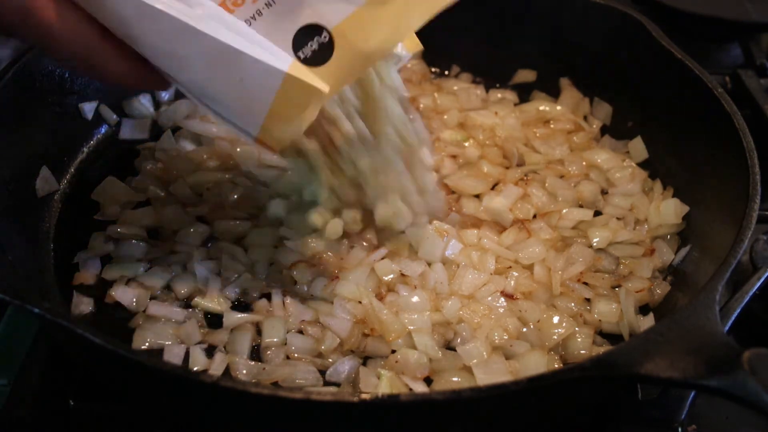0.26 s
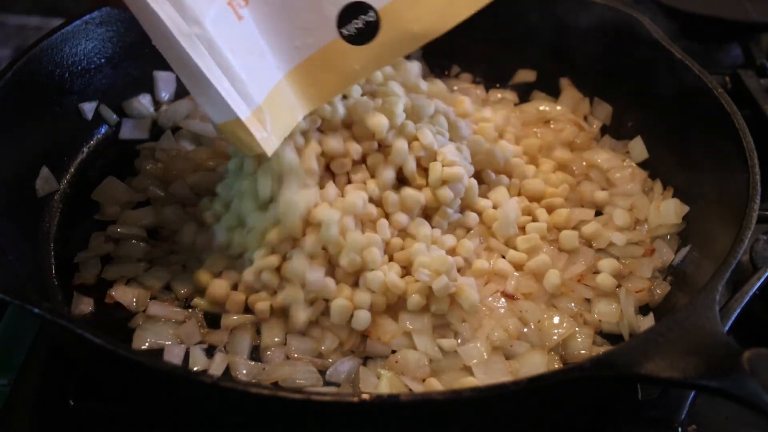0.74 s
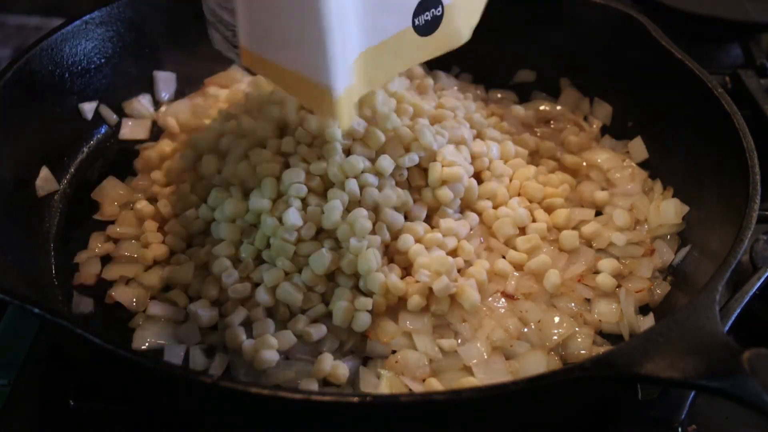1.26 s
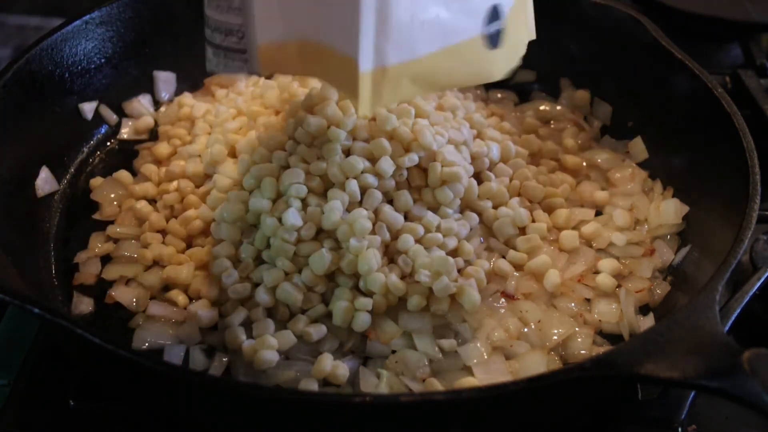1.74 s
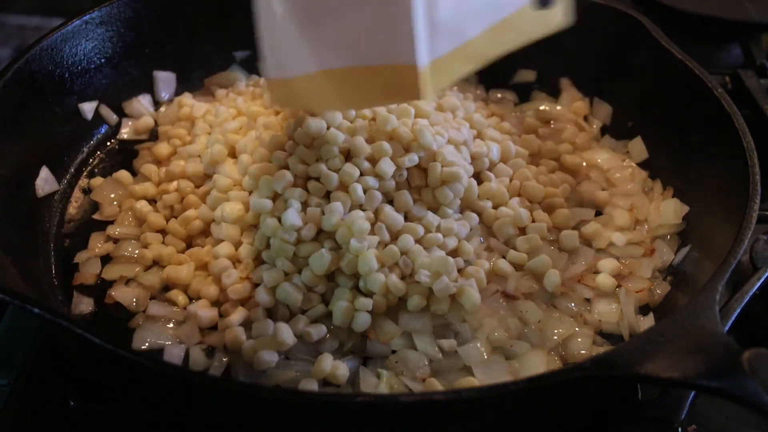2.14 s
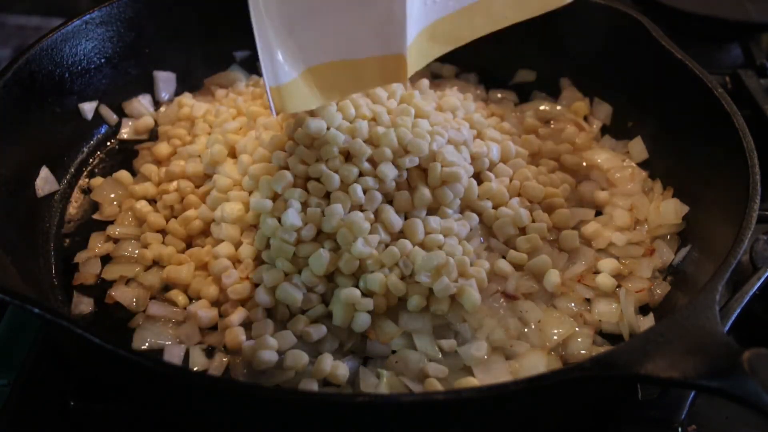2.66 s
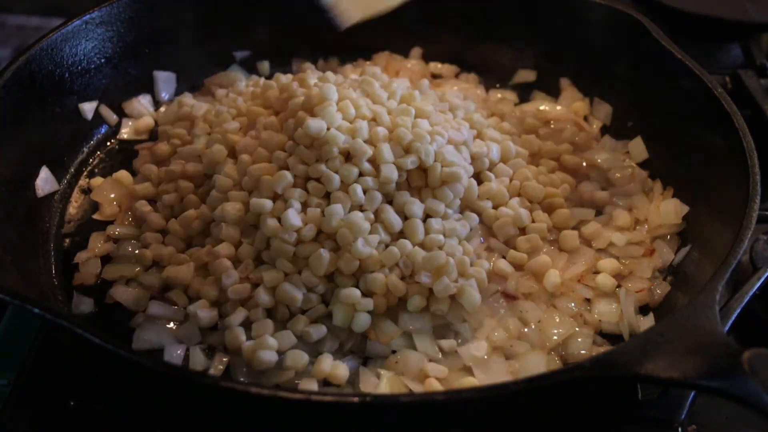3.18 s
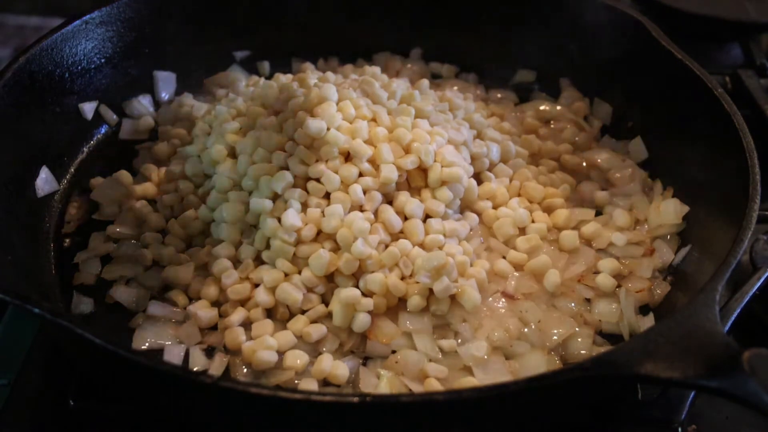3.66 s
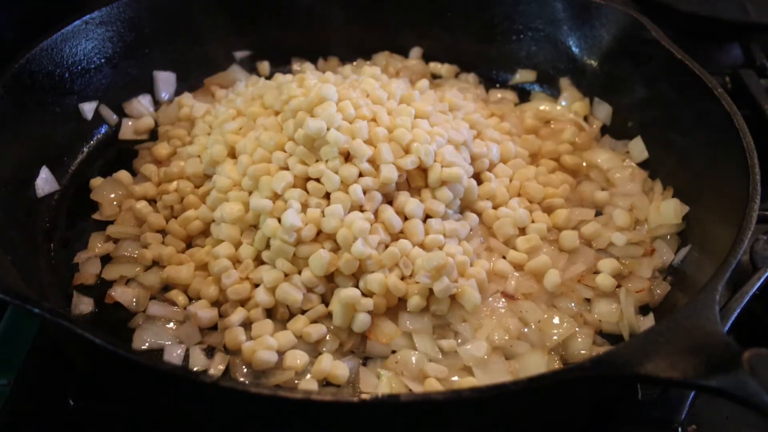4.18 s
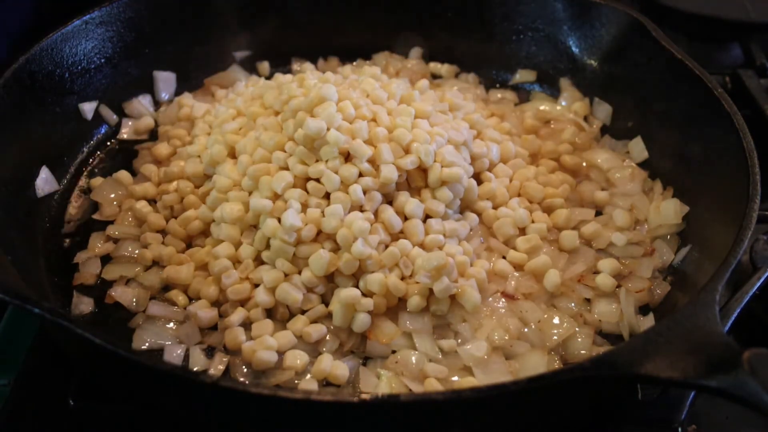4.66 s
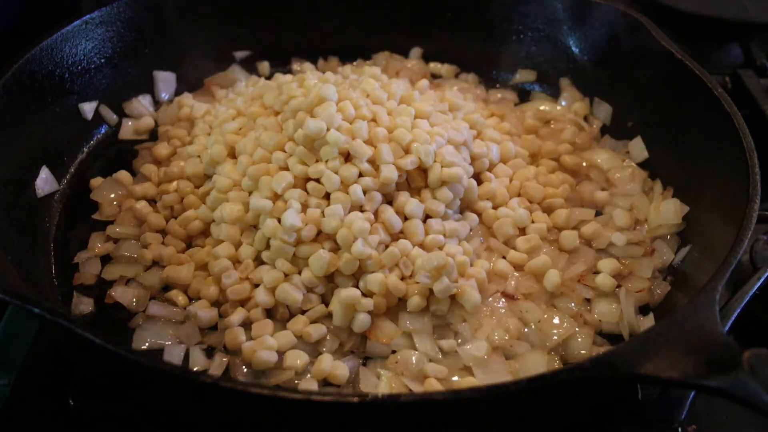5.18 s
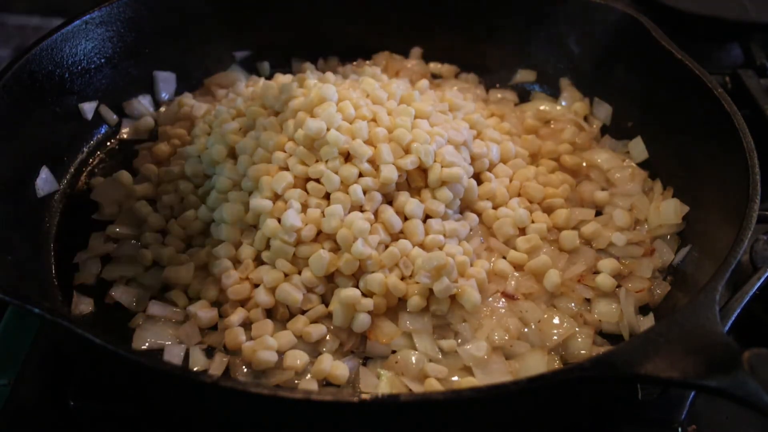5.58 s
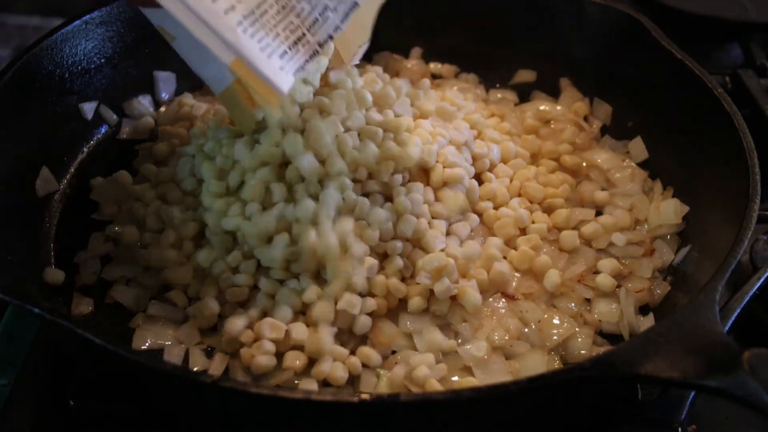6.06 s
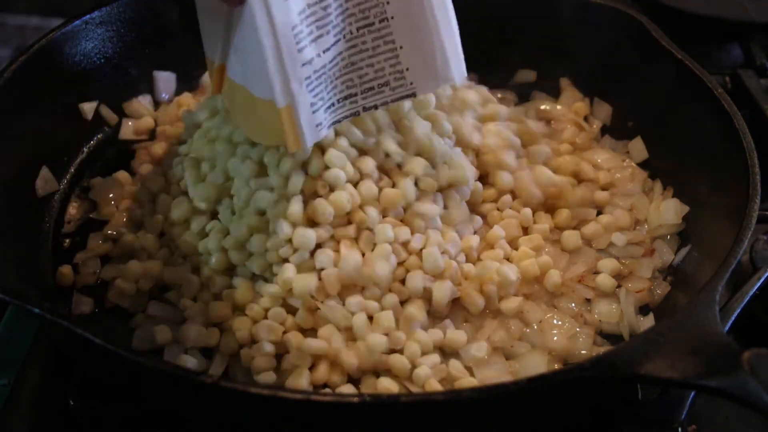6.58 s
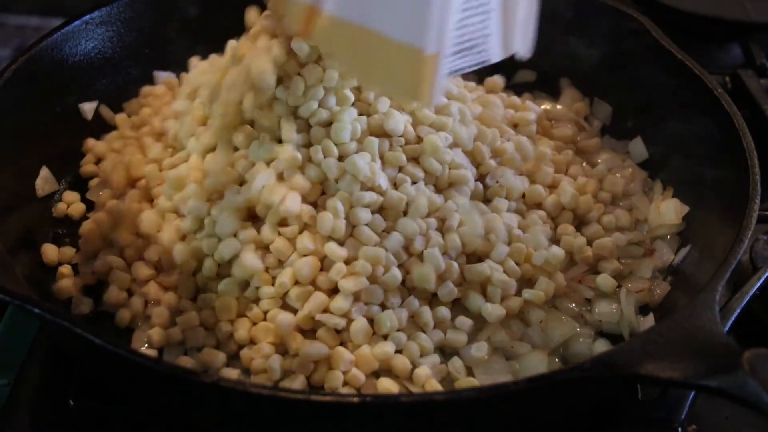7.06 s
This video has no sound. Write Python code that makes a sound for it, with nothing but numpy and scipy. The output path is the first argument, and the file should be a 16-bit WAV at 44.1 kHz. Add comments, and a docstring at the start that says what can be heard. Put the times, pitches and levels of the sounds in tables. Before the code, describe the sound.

A skillet hisses steadily with tiny bright ticks. Hard kernels scrape down plastic film, knock on the hollow bag and patter on a growing heap; shakes bring clusters of sharp crackles. After a quieter gap around the middle, the bag returns and pours again, densely and loudly, over a livelier sizzle. Close stereo pickup in a kitchen with a faint low background rush.

```python
"""Crackles of a stiff plastic bag, close to a camera microphone in a kitchen, over the hiss of a skillet.
Frozen corn is shaken from the bag onto frying onions: kernels scrape down the film, knock on it and patter
on the heap. Film buckles are shaped noise bursts with short pitched rings; damped modes ring the bag's hollow.
Under it fat sizzles as noise with tiny rings in it and spits in fine ticks, over the low rush of the room."""
import sys
import numpy as np
from scipy import signal
from scipy.fft import rfft, irfft, next_fast_len
from scipy.io import wavfile
from scipy.ndimage import uniform_filter1d, map_coordinates

SR = 44100
rng = np.random.default_rng(int(sys.argv[2]) if len(sys.argv) > 2 else 0)


def file_out(sig):
    """Save sig as 16-bit WAV at sys.argv[1]."""
    # one column per channel
    cols = np.atleast_2d(sig).T
    # limit, then scale
    lim = np.clip(cols, -1, 1)
    pcm = np.round(lim * 32767).astype(np.int16)
    wavfile.write(sys.argv[1], SR, pcm)


N = 323226

# kernels still moving between slides, before layer trims: (tumbling [dB], sliding [dB], landing [dB])
STRAGGLERS = (-54.5, -45.5, -58.5)
# colour of a thin bright tick: (frequency [Hz], level [dB])
TICK_SPECTRUM = [(100, -18), (1000, -11), (3200, 3), (8500, -3.5), (16000, -16)]


def amp(db):
    """Decibels to gain."""
    return 10 ** (np.asarray(db) / 20)


def unit(x):
    """Scaled to rms 1."""
    return x / np.sqrt(np.mean(x ** 2) + 1e-20)


def along(points, hz):
    """(frequency, value) points read on a log frequency axis."""
    f, v = np.transpose(points)
    return np.interp(np.log(hz + 1), np.log(f + 1), v)


def filtered(x, response):
    """x times a response of frequency."""
    m = next_fast_len(N + SR // 2)
    spectrum = rfft(x, m) * response(np.fft.rfftfreq(m, 1 / SR))
    return irfft(spectrum, m)[..., :N]


def high_passed(x, hz, order=2):
    """x with its bass rolled off below hz."""
    return signal.lfilter(*signal.butter(order, hz, 'high', fs=SR), x)


def causal(spectrum, size=1024):
    """Minimum-phase impulse response of a spectrum: the sharpest onset it allows."""
    cepstrum = irfft(np.log(amp(along(spectrum, np.fft.rfftfreq(size, 1 / SR)))))
    # fold the cepstrum onto positive time
    cepstrum[1:size // 2] *= 2
    cepstrum[size // 2 + 1:] = 0
    return irfft(np.exp(rfft(cepstrum)))


def tilted(spectrum, db, slope, pivot_hz=2100, lowest_hz=450):
    """A spectrum raised by db and tilted by slope dB per octave about a pivot, with no more tilt below lowest_hz."""
    return [(hz, level + db + slope * np.log2(max(hz, lowest_hz) / pivot_hz)) for hz, level in spectrum]


def peaked(spectrum, hz, lift_db=2.5, octaves=0.79):
    """A spectrum with a broad hump about one pitch."""
    grid = np.geomspace(30, 16000, 60)
    hump = np.exp(-.5 * (np.log2(grid / hz) / octaves) ** 2)
    return list(zip(grid, along(spectrum, grid) + lift_db * hump))


def evened(x, size=41):
    """A burst with its broad spectral humps and holes levelled out."""
    z = rfft(x, 2 * x.shape[1])
    power = np.abs(uniform_filter1d(np.abs(z) ** 2, size))
    return irfft(z / np.sqrt(power + 1e-12))[:, :x.shape[1]]


def spread(pair, spectrum):
    """Two unrelated signals become a coloured stereo sound of rms 1, near mono in the bass."""
    # how alike the two sides are: (frequency [Hz], left-right correlation [ratio])
    likeness = [(60, 0.95), (300, 0.98), (700, 0.92), (1400, 0.89), (2800, 0.71), (5500, 0.45),
                (14000, 0.76)]

    def mid_and_side(hz):
        turn = np.arccos(np.clip(along(likeness, hz), -1, 1)) / 2
        return np.array([np.cos(turn), np.sin(turn)])

    mid, side = filtered(pair, mid_and_side)
    stereo = [mid + side, mid - side]
    return unit(signal.fftconvolve(stereo, causal(spectrum)[None], axes=1)[:, :N])


def grains(rate, scatter_db, cycles, low_hz, high_hz, count=14):
    """Two streams of tiny damped rings at count pitches, most faint and a few strong, rms 1.

    rate is rings per second in each stream; a ring falls 60 dB in the given cycles."""
    out = np.zeros((2, N))
    for hz in np.geomspace(low_hz, min(high_hz, SR * .45), count):
        when, chance, sign = rng.random((int(2 * rate * N / SR / count), 3)).T
        strength = amp(-scatter_db * np.log(chance + .03)) * np.sign(sign - .5)
        taps = np.bincount((when * 2 * N).astype(int), strength, 2 * N).reshape(2, N)
        radius = 1000 ** (-hz / (cycles * SR))
        poles = [1, -2 * radius * np.cos(2 * np.pi * hz / SR), radius ** 2]
        out += signal.lfilter([1 - radius, 0, radius - 1], poles, taps)
    return unit(out)


def click(spectrum, t60, pan_db, spike, width, size=2048):
    """A sudden release and a short flutter after it, which reaches each ear a little differently."""
    t = np.arange(size) / SR
    flutter = rng.standard_normal((2, size)) * amp(-60 * t / max(t60, .001))
    flutter[0, 0] += spike * np.linalg.norm(flutter[0]) * rng.choice([-1, 1])
    mid, side = evened(flutter)
    side = width * high_passed(side, 2500, order=1)
    pair = np.array([mid + side, mid - side]) / np.linalg.norm(mid)
    pan = amp([[pan_db / 2], [-pan_db / 2]])  # positive is left
    return signal.fftconvolve(pair, causal(spectrum)[None], axes=1) * pan


def facet(pair, hz, share, cycles=16, width=0.36):
    """Adds a short ring at one pitch, share times as strong as the click; the total energy stays the same."""
    t = np.arange(pair.shape[1]) / SR
    skew = width * rng.standard_normal() * np.array([[1], [-1]])  # phase between the sides
    ring = np.sin(2 * np.pi * hz * t + skew) * amp(-60 * hz * t / cycles)
    ring *= np.sign(np.sum(ring * pair))  # it swings the way the click pushes it
    mixed = pair + share * np.linalg.norm(pair) * ring / np.linalg.norm(ring)
    return mixed * np.linalg.norm(pair) / np.linalg.norm(mixed)


def add(track, s, sound):
    """Mix a sound into the track at a time in seconds."""
    part = track[:, max(round(s * SR), 0):][:, :sound.shape[1]]
    part += sound[:, :part.shape[1]]


def surges(depth_db, rate):
    """A gain that wanders smoothly at random, rate knots a second."""
    knots = rng.standard_normal(2048)
    return amp(depth_db * map_coordinates(knots, [np.arange(N) * rate / SR], order=3, mode="wrap"))


def flow(layer, size=64):
    """Gain of one layer of the pour: each slide swells, holds and dies away, and slides add in power."""
    # each tip or shake of the bag lets a slide of kernels go; levels are before layer trims:
    # (start [s], rise [s], hold [s], release [s], tumbling [dB], sliding on the film [dB],
    #  landing on the heap [dB], flare of the fat [dB])
    tips = [(-0.01, 0.49, .12, 1.2, -29, -35, -54, -49), (0.365, .04, .03, .06, -35, -28, -59, -44),
            (0.897, 0.041, 0.38, 0.5, -36.5, -44, -49, -59), (1.394, 0.04, .14, 0.17, -36, -41, -58, -59),
            (1.758, 0.023, 0.026, 0.1, -27, -38, -49, -38), (1.894, 0.028, 0.026, 0.14, -38, -55, -52, -59),
            (2.057, 0.024, 0.034, 0.15, -27.5, -27, -48, -49),
            (2.187, 0.035, 0.019, 0.18, -27.5, -28, -46, -54),
            (2.45, 0.027, 0.11, .1, -37.5, -46, -46, -59), (2.584, .015, .085, .12, -33, -37.5, -48, -56),
            (2.72, .01, 0.045, .05, -40, -47, -43, -59), (2.813, .008, 0.04, 0.12, -37.5, -40, -58, -51),
            (3.172, 0.017, 0.087, 0.26, -35, -38.5, -49, -43),
            (3.517, 0.019, 0.077, 0.16, -36, -33, -49, -42),
            (3.87, 0.056, 0.069, 0.077, -44.5, -45, -51, -58),
            (4.24, 0.022, 0.022, 0.11, -36, -40, -62, -50), (4.329, .008, 0.11, 0.3, -31, -36, -56, -38),
            (4.495, 0.016, 0.11, 0.14, -33, -40, -57, -40), (4.788, 0.038, 0.072, 0.11, -49, -41, -68, -44),
            (5.259, 0.058, 0.087, 0.97, -37, -34.5, -54, -36.5),
            (5.416, 0.25, 0.069, 0.48, -29, -25, -43, -34),
            (5.965, 0.031, 0.026, 0.11, -33, -47, -62, -54.5),
            (6.15, 0.021, .06, 0.34, -36.5, -35.5, -61.5, -52),
            (6.284, 0.16, 0.21, 0.22, -26.5, -28.5, -43.5, -36.5),
            (6.795, 0.035, 0.2, 0.18, -37, -42, -48, -41),
            (7.01, 0.049, 0.034, 0.12, -32.5, -31.5, -45, -38)]
    release_db = 15.5  # a slide dies by this much in its release time
    t = np.arange(0, N + size, size)[:, None] / SR
    start, rise, hold, release, *levels = np.transpose(tips)
    db = dict(zip(("tumble", "slide", "land", "flare"), levels))[layer]
    swell = np.clip((t - start) / np.maximum(rise, .005), 0, 1)
    dying = np.maximum(t - start - rise - hold, 0) / np.maximum(release, .02)
    gains = swell * amp(db - release_db * dying)
    return np.interp(np.arange(N) / SR, t[:, 0], np.linalg.norm(gains, axis=1))


def hollow(x, flex=.004, scatter_db=2, size=11025):
    """The air and walls of the bag ring on; as it flexes, the modes shift a little in pitch and trade strength."""
    # modes of the bag, before flexing: (frequency [Hz], t60 [s], level [dB])
    bag_modes = [(195, .14, -4), (344, .16, 0), (610, .07, -8), (1043, .08, -6), (1177, .15, 1),
                 (1395, .04, -11)]
    # how freely the hollow rings: (time [s], level [dB])
    freedom = [(.5, 3.5), (1.4, 0.5), (2.1, 5.5), (3.7, 2), (4.3, -23), (5.6, -0.5), (7.2, 3.5)]
    t = np.arange(SR // 6) / SR
    hz, t60, db = np.transpose(bag_modes)[:, :, None]
    free_db = np.interp(np.arange(N) / SR, *np.transpose(freedom))
    drive = amp(free_db) * x.mean(axis=0)
    fading = amp(db - 60 * t / t60) * 2 * np.log(1000) / (t60 * SR)
    out = np.zeros((1, N))
    for start in range(0, N, size):  # a new flex for each block
        detune, gain = rng.uniform(-1.17, 1, (2, len(bag_modes), 1))
        swing = np.cos(2 * np.pi * hz * (1 + flex * detune) * t)
        ring = np.sum(amp(scatter_db * gain) * fading * swing, axis=0)
        add(out, start / SR, signal.fftconvolve(drive[start:start + size], ring)[None])
    return out[0]


def kitchen(level_db=-55):
    """The low rush of the kitchen: steady coloured noise."""
    # (frequency [Hz], level [dB])
    rush_spectrum = [(20, -1), (45, -31), (110, 5), (400, 1), (900, 4.5), (3000, -19), (16000, -46)]
    return amp(level_db) * spread(rng.standard_normal((2, N)), rush_spectrum)


def room(x):
    """Stove and kitchen walls answer with a short noise tail; bass dies first, the middle rings longest."""
    # (frequency [Hz], t60 [s])
    wall_decay = [(150, 0.02), (1200, 0.2), (5000, 0.089), (15000, 0.078)]
    hz, t, z = signal.stft(rng.standard_normal((2, SR // 3)), SR, nperseg=256)
    fading = amp(-60 * t / along(wall_decay, hz)[:, None])
    tail = signal.istft(z * fading, SR, nperseg=256)[1]
    # the answer comes 1/300 s late
    tail = np.pad(tail / np.linalg.norm(tail[0]), ((0, 0), (SR // 300, 0)))
    return signal.fftconvolve(x, tail, axes=1)[:, :N]


def sizzle(trim_db=4, pop_db=-5):
    """Steam bubbles in the fat merge into a hiss with single pops; it flares as icy kernels land."""
    # (frequency [Hz], level [dB])
    fat_spectrum = [(100, -19), (500, -2), (1100, -5), (1450, 4), (2200, 4), (3100, 7.5), (4300, 4.5),
                    (6400, 3.5), (10000, -1), (15800, -2)]
    # before trim: fat with onions alone, then with corn in it after 0.32 s
    steady = amp(np.interp(np.arange(N) / SR, [0, 0.32], [-44.5, -38]))
    pops = grains(rate=450, scatter_db=2.8, cycles=15, low_hz=1385, high_hz=13040)
    fizz = rng.standard_normal((2, N)) + amp(pop_db) * pops
    strength = np.hypot(steady, flow("flare")) * surges(depth_db=1.5, rate=13)
    return amp(trim_db) * strength * spread(fizz, fat_spectrum)


def spits(level_db=-17.5, scatter_db=3, pitch_hz=5000, octaves=1.3, t60=0.0017, count=130):
    """Droplets burst in the fat all the time, each a fine tick with a ring of its own pitch."""
    out = np.zeros((2, N))
    for when, a, b, c in rng.random((count, 4)):
        hz = pitch_hz * 2 ** (octaves * (2 * b - 1))
        burst = click(TICK_SPECTRUM, t60, 8 * (c - .5), spike=.5, width=0.58, size=256)
        tick = facet(burst, hz, cycles=12, share=.7)
        add(out, when * N / SR, amp(level_db - scatter_db * np.log(a + .03)) * tick)
    return out


def ticks(trim_db=-1, pan_db=1, pan_spread_db=3.0):
    """Very short bright ticks with no body, scattered across the pan."""
    # spitting fat and creasing film, strength before trim:
    # (time [s], strength [dB], brightness [dB per octave], t60 [s])
    tick_events = [(0.1474, -0.5, -5, .025), (0.184, -6, 6, .008), (0.23, -11, 9, .005),
                   (0.2609, 8.5, 2.5, 0.039), (0.524, 7, 7, 0.0096), (0.7746, -4, 5, 0.015),
                   (0.842, -6, 2, .005), (1.09, 2, -2, .006), (1.6494, -6.5, 4, 0.0046),
                   (1.7, 0, 2.5, .005), (2.179, -2, 1, .006), (2.225, 3, -1, .008), (2.792, -1.5, 3, .005),
                   (3.0198, -2, -5, 0.0088), (3.1636, 2, 6.5, 0.0031), (3.31, 4, 2, .004),
                   (3.184, -4, 6, .005), (3.4076, 0.5, 2, .006), (3.462, -2, -4, .006),
                   (3.731, -4, 1, .005), (3.839, -2, -10.5, .02), (3.886, 2, -3, 0.013),
                   (3.899, -2, -4, .005), (4.019, -6, -8, .008), (4.113, -9, 4, .004),
                   (4.145, -10, 14, .017), (4.185, -3, 3, .004), (4.3478, 2, 12.5, 0.014),
                   (4.439, 2, 2.5, .005), (4.72, 0.5, -6, 0.0043), (4.772, 0.5, 0, 0.0081),
                   (4.951, 2, 6, 0.0088), (4.9642, 8, 6, 0.0037), (4.984, 0, 2, 0.0065),
                   (5.0918, 1, 2, 0.02), (5.142, -9, -1, .004), (5.49, 0, 2, .005), (5.56, 1, 7.5, .005),
                   (5.8056, 5.5, 7.5, 0.01), (5.9436, 7.5, -4, 0.0077), (6.025, -1, 1, .005),
                   (6.038, 4, -3, 0.0042), (6.195, 0.5, 4, .018), (6.452, 4, -2, .005),
                   (6.6445, 5.5, -0.5, 0.01), (6.78, 3.5, -5.5, 0.012), (6.881, 2.5, -1.5, 0.0055),
                   (6.931, -1, -2, .005), (7.0138, 4.5, -2, 0.0041), (7.135, 4.5, -5, 0.0075),
                   (7.15, 0, -6, 0.014), (7.168, 2, -1, 0.0062)]
    out = np.zeros((2, N))
    for s, db, slope, t60 in tick_events:
        pan = pan_db + pan_spread_db * rng.standard_normal()
        colour = tilted(TICK_SPECTRUM, db, slope, pivot_hz=5100, lowest_hz=2600)
        add(out, s, amp(trim_db) * click(colour, t60, pan, spike=0.37, width=0.9))
    return out


def heap(trim_db=-1):
    """Clumps of kernels land with dull, overlapping thuds."""
    # (frequency [Hz], level [dB])
    heap_spectrum = [(25, -19), (55, -25), (100, -1), (170, -3.5), (260, 0), (500, -31), (2000, -68)]
    weight = np.hypot(flow("land"), amp(STRAGGLERS[2]))
    bumps = grains(rate=160, scatter_db=2.5, cycles=5.0, low_hz=74.4, high_hz=310, count=6)
    return amp(trim_db) * weight * spread(bumps, heap_spectrum)


def thuds(t60=0.054, rise_s=.003, noise_db=-6):
    """A soft, low bump for each big clump, with a brief pitch of its own."""
    # a frozen clump drops on the heap or against the bag: (time [s], level [dB], pitch [Hz])
    clump_drops = [(.29, -36, 262), (1.018, -36, 105), (1.13, -27, 163), (1.369, -33, 109),
                   (1.467, -20, 620), (1.776, -16.5, 338), (2.139, -28, 170), (2.359, -36, 140),
                   (2.523, -23, 400), (2.847, -26, 605), (3.48, -40, 130), (4.335, -29, 483),
                   (4.458, -28, 520), (4.5, -22, 500), (4.824, -35, 480), (4.907, -33, 536),
                   (5.189, -36, 330), (6.325, -25, 646), (6.66, -23, 590), (6.84, -25, 170.4),
                   (7.146, -30, 131)]
    # colour of the noise in a bump: (frequency [Hz], level [dB])
    thud_spectrum = [(30, -40), (80, -17), (140, -8), (260, -3), (450, 3), (900, -24), (3000, -64)]
    out, t = np.zeros((2, N)), np.arange(SR // 5) / SR
    for s, db, hz in clump_drops:
        noise = rng.standard_normal(len(t) + 1023)
        noise = unit(signal.fftconvolve(noise, causal(thud_spectrum), "valid"))
        body = unit(unit(np.sin(2 * np.pi * hz * t)) + amp(noise_db) * noise)
        envelope = amp(db - 60 * t / t60) * (1 - np.exp(-t / rise_s))
        add(out, s, np.tile(envelope * body, (2, 1)))
    return out


def collisions(rate=150, t60=0.029, share=0.49, scatter_db=1.7):
    """A gain of rms 1 that jumps at each collision in the stream and falls at once."""
    when, chance = rng.random((int(rate * N / SR), 2)).T
    energy = amp(-scatter_db * np.log(chance + .05)) ** 2
    hits = np.bincount((when * N).astype(int), energy, N)
    power = signal.lfilter([1], [1, -amp(-60 / (t60 * SR)) ** 2], hits)
    return np.sqrt(1 - share + share * power / power.mean())


def kernels(tumble_trim_db=-1.15, slide_trim_db=-1, ring_db=-1):
    """Hard kernels knock on each other and on the heap, and scrape along the film of the bag, in clumps."""
    # kernel on kernel: (frequency [Hz], level [dB])
    tumble_spectrum = [(25, -39), (55, -17), (110, -7), (200, -4), (340, -0.5), (460, 1.5), (590, 1.5),
                       (850, -1), (1170, -1.5), (1450, -3), (2100, -5.5), (4000, -20), (16000, -39)]
    # kernel on film: (frequency [Hz], level [dB])
    slide_spectrum = [(300, -28), (1000, 3.5), (1700, 7), (2200, 3), (3100, 5.5), (4500, -2.5), (8000, -16),
                      (16000, -21)]
    clumps = surges(depth_db=0.3, rate=22) * collisions()
    bumps = grains(rate=1200, scatter_db=2.0, cycles=9.3, low_hz=165.0, high_hz=2600)
    bumps = spread(clumps * bumps, tumble_spectrum)
    scrapes = grains(rate=1100, scatter_db=2.5, cycles=17, low_hz=1167, high_hz=8030)
    scrapes = spread(clumps * scrapes, slide_spectrum)
    patter = amp(tumble_trim_db) * np.hypot(flow("tumble"), amp(STRAGGLERS[0])) * bumps
    rustle = amp(slide_trim_db) * np.hypot(flow("slide"), amp(STRAGGLERS[1])) * scrapes
    return patter + rustle + amp(ring_db) * hollow(patter)


def knock(hz, cycles=13, crack_db=-8, crack_s=.005, width=0.37, size=768):
    """One kernel strikes the film: a tiny crack and a few short modes, different each time; peak 1."""
    # what a knock rings with, before random detuning: (multiple of its pitch [ratio], level [dB])
    strike_modes = [(.52, -8.5), (.77, -9), (1, 1), (1.43, -5.5), (2.1, -1), (3.1, -5)]
    t = np.arange(size) / SR
    ratio, db = np.transpose(strike_modes)[:, :, None]
    detune, gain, skew = rng.standard_normal((3, len(ratio), 1))
    turns = hz * ratio * (1 + 0.047 * detune) * t
    swing = np.sin(2 * np.pi * turns + width * np.array([skew, -skew]))
    modes = amp(db + 2.1 * gain - 60 * turns / cycles) * swing
    crack = amp(crack_db - 60 * t / crack_s) * rng.standard_normal((2, size))
    pair = (modes.sum(axis=1) + crack) * (1 - np.exp(-t / 0.00036))
    return pair / np.abs(pair).max()


def knocks(stream_db=6, scatter_db=8, pitch_hz=1900, octaves=0.895, low_hz=550, ring_db=-12, count=300):
    """Single kernels knock on the taut wall of the bag, and a stream of others follows the flow in strength."""
    # clear knocks, peak before the bass is rolled off: (time [s], peak [dB], pitch [Hz])
    clear_knocks = [(.205, -15, 1480), (0.418, -18.5, 2830), (.445, -13, 1670), (.575, -17.5, 1250),
                    (.613, -16, 1500), (.677, -11, 2790), (1.021, -17, 1170), (1.088, -24, 976),
                    (1.207, -16, 1600), (1.393, -16, 1130), (1.442, -19, 700), (1.465, -11, 1900),
                    (1.485, -10, 1330), (1.541, -22, 2050), (1.56, -18, 800), (1.586, -18, 1210),
                    (1.699, -20, 2760), (1.811, -16, 1180), (1.862, -22, 1070), (2.081, -9, 1980),
                    (2.103, -11, 1400), (2.13, -17, 1180), (2.178, -10, 2000), (2.219, -15, 2900),
                    (2.225, -19, 1400), (2.236, -12, 1160), (2.255, -13, 1190), (2.3, -12, 2600),
                    (2.367, -23, 1000), (2.529, -24, 594), (2.552, -21, 1270), (2.649, -22, 1190),
                    (2.728, -20, 1180), (2.835, -18, 2400), (3.026, -15, 2730), (3.096, -17.5, 1290),
                    (3.207, -18, 1030), (3.309, -19, 1270), (3.449, -17, 1100), (3.553, -9, 1920),
                    (3.606, -20, 1160), (3.623, -16, 1250), (3.669, -23, 1170), (3.69, -23, 2940),
                    (3.926, -26, 1560), (4.019, -23, 2300), (4.219, -21, 3060), (4.334, -15, 900),
                    (4.559, -11, 1430), (4.673, -20, 2560), (4.701, -13, 2700), (5.254, -21, 1070),
                    (5.384, -18, 900), (5.49, -20, 1310), (5.515, -15, 1140), (5.649, -14, 1170),
                    (5.715, -13, 2230), (5.736, -7, 2860), (5.789, -8, 2780), (5.959, -13.5, 1360),
                    (5.985, -13, 2130), (6.038, -23, 1390), (6.095, -19, 950), (6.251, -21, 1210),
                    (6.299, -20, 1110), (6.451, -18, 1060), (6.564, -11, 2920), (6.628, -21, 2100),
                    (6.673, -19, 2750), (6.702, -24, 1500)]
    out, moving = np.zeros((2, N)), np.hypot(flow("tumble"), flow("slide"))
    for s, db, hz in clear_knocks:
        add(out, s, amp(db) * knock(hz))
    for when, a, b in rng.random((count, 3)):
        gain = moving[int(when * N)] * amp(stream_db + scatter_db * a)
        hz = pitch_hz * 2 ** (octaves * (2 * b - 1))
        add(out, when * N / SR, gain * knock(hz))
    out = high_passed(out, low_hz)
    return out + amp(ring_db) * hollow(out)


def chatter(snap, gap_s=.0016, loss_db=8, low_hz=1800, count=2):
    """The film gives way in a few quick jerks, each weaker than the last and thinner than the first."""
    out, s = np.pad(snap, ((0, 0), (0, SR // 50))), 0
    jerk = high_passed(snap, low_hz)
    for k, (a, b) in enumerate(rng.random((count, 2)), 1):
        s += gap_s * (.5 + a)
        add(out, s, np.sign(b - .5) * amp(-loss_db * k) * jerk)
    return out * np.linalg.norm(snap) / np.linalg.norm(out)


def creases(pitch_hz=2000, octaves=1.16, slope=-1, slope_spread=1.0, ring=0.62, t60=0.022, count=110):
    """Small buckles at random moments, stronger as more kernels move over the film; rows like the big ones."""
    # strength at full flow, dB gained per dB of flow, scatter either way
    full_db, grows, spread_db = 3.5, 0.37, 3.5
    full_flow_db = -26
    moving_db = 20 * np.log10(np.hypot(flow("tumble"), flow("slide")) + 1e-4)
    rows = []
    for when, a, b, c in rng.random((count, 4)):
        db = full_db + grows * (moving_db[int(when * N)] - full_flow_db) + spread_db * (2 * b - 1)
        hz = pitch_hz * 2 ** (octaves * (2 * a - 1))
        brightness = slope + slope_spread * (2 * c - 1)
        rows.append((when * N / SR, hz, db, brightness, t60, ring))
    return rows


def bag(trim_db=-3.0, ring_db=-1, low_hz=130, pan_db=0.6, pan_spread_db=0.7):
    """Each buckle of the stiff film snaps, and the hollow of the bag rings on briefly."""
    # the big buckles, strength before trim: (time [s], pitch of the flexing facet [Hz], strength [dB],
    #  brightness [dB per octave], t60 [s], ring of the facet over the snap [ratio])
    crackles = [(0.2835, 1540, 10, -2, 0.03, 0.79), (0.3417, 1450, 9.5, 1.5, 0.038, 0.53),
                (0.434, 2700, 12.5, 1.5, 0.013, 0.8), (0.9287, 1310, 13, -4, 0.0087, 0.91),
                (.94, 1380, 15.5, -3, .019, 0.52), (.989, 1200, 9, -8, .03, 0.74),
                (1.054, 2050, 17, -2.5, 0.02, 1.1), (1.1308, 1583, 12, -5, 0.062, .8),
                (1.3, 1210, 11, -4.5, 0.038, 1.2), (1.354, 2590, 12, -4, 0.015, 1.5),
                (1.4106, 1270, 17, 2.5, 0.0056, 0.31), (1.453, 1270, 15.5, -4, .02, .6),
                (1.4714, 1140, 19.5, 0, .03, 0.86), (1.509, 1310, 12, -4, .03, 0.64),
                (1.5936, 1110, 12, -5.5, .057, 0.26), (1.692, 1380, 9, -4.5, 0.038, 0.68),
                (1.7342, 3030, 19.5, .5, 0.018, 0.8), (1.777, 3300, 19, -2, .025, .5),
                (1.7814, 1200, 16.5, -2.5, 0.019, .5), (1.819, 4600, 17.5, -1.5, .018, 0.32),
                (1.825, 1160, 16.5, -1, .035, .5), (2.071, 5260, 16, 0.5, 0.05, .2),
                (2.0938, 2960, 16, 5.5, 0.015, 0.22), (2.117, 1960, 8, 4, 0.018, 0.45),
                (2.1585, 1190, 17.5, -1.5, 0.011, 0.78), (2.24, 1170, 18.5, -.5, .025, 0.54),
                (2.2748, 646, 17.5, 2, 0.0065, 0.42), (2.315, 2140, 15.5, -1.5, .018, 0.71),
                (2.34, 2920, 10, -4.5, .023, 0.65), (2.42, 3230, 2, -8, 0.039, .4),
                (2.502, 3240, 9.5, -3.5, 0.018, 0.88), (2.594, 2540, 9, -1, .02, 1.2),
                (2.6216, 2840, 11.5, 4, 0.0089, 0.4), (2.6624, 1160, 13, -1.5, 0.038, 0.45),
                (2.76, 1230, 7, -4.5, .037, .8), (2.8187, 2520, 9.5, 0, 0.042, 1.2),
                (2.846, 2600, 8, 1, 0.027, .2), (2.9092, 2930, 14, -2, .018, 1.5),
                (2.928, 2700, 5, -1.5, .02, .5), (3.1116, 1072, 16, -0.5, 0.0091, 0.43),
                (3.1927, 2570, 9.5, -1, 0.031, 0.66), (3.242, 2560, 15, -1, .028, .7),
                (3.275, 1050, 12.5, -1.5, .029, 0.69), (3.3291, 1290, 11, -4.5, 0.052, 0.55),
                (3.345, 1390, 11.5, -2.5, 0.048, .5), (3.364, 1680, 11, 2, 0.015, 0.53),
                (3.4996, 1190, 17.5, -2, 0.019, .45), (3.542, 1080, 18.5, 0, 0.12, .4),
                (3.5588, 4120, 17.5, 2, 0.0091, 0.37), (3.5851, 2430, 18, -1, 0.016, .7),
                (3.6519, 1170, 11, -1, .035, 1.1), (3.7562, 3100, 9, 1.5, .02, 1.9),
                (3.912, 5000, 10, -0.5, .014, 0.48), (3.958, 1110, 6.5, -4, .04, 1.6),
                (4.244, 2140, 11, -1.5, .03, 0.33), (4.327, 2000, 10.5, -6.5, 0.055, .5),
                (4.356, 5800, 16, -3.5, .057, 0.39), (4.3894, 2050, 15.5, -3.5, .029, 0.55),
                (4.412, 1700, 5, -3, .02, .7), (4.456, 1200, 10, -3, .02, 0.51),
                (4.596, 2000, 7.5, -4, .02, .8), (4.518, 1420, 13.5, -3, .04, 0.59),
                (4.568, 1430, 4.5, 7.5, 0.017, 0.5), (4.6467, 1520, 11.5, 1.5, .025, 0.45),
                (4.8228, 1550, 2.5, -4, 0.008, 0.64), (4.8731, 3220, 9, 1, 0.0098, .7),
                (5.1897, 1300, 14, 0, 0.0045, 0.17), (5.3083, 3600, 13.5, 2.5, 0.026, 0.83),
                (5.335, 2810, 12, -1.5, .012, 1), (5.369, 1840, 9.5, -4.5, .025, .7),
                (5.4082, 1490, 11, 2, .0097, 0.55), (5.4795, 1360, 15.5, -2.5, .011, 1),
                (5.5325, 1110, 17, 1, 0.022, 0.43), (5.569, 1230, 16, 1, .045, 0.49),
                (5.671, 3070, 19.5, 0, 0.014, 0.61), (5.69, 2450, 17, -4, 0.026, 1.2),
                (5.7061, 2400, 14.5, 2.5, .02, 1.2), (5.714, 2500, 7, -3, .015, 1.5),
                (5.7438, 2870, 17.5, 1, .022, .8), (5.862, 1240, 19.5, 1, 0.034, 0.33),
                (5.911, 1540, 18, -2.5, .023, 0.27), (6.0, 3170, 15.5, -1, .013, 0.75),
                (6.0463, 3800, 13.5, -2, .0094, 0.79), (6.16, 5240, 13, 2, 0.013, 0.29),
                (6.1748, 2270, 12, -2, .0065, 0.95), (6.2637, 1160, 14, -2, 0.0091, 0.7),
                (6.324, 1100, 12, -3.5, .019, 0.54), (6.3934, 1440, 16, -2, 0.043, 0.54),
                (6.4348, 1400, 13.5, -0.5, 0.024, 0.63), (6.4956, 1320, 13, 2, .018, 0.54),
                (6.764, 1090, 9.5, 0, .032, 0.45), (6.85, 3440, 12, 1, .03, 0.86),
                (6.9769, 1090, 17.5, -2, 0.019, .5), (7.057, 3250, 17, -1, 0.0072, 1)]
    # colour of a snap: (frequency [Hz], level [dB])
    snap_spectrum = [(30, -32), (130, -21), (420, -9.5), (1250, -2.5), (3000, -2), (8500, -10.5),
                     (16000, -23.5)]
    snaps = np.zeros((2, N))
    for s, hz, db, slope, t60, ring in [*crackles, *creases()]:
        pan = pan_db + pan_spread_db * rng.standard_normal()
        colour = peaked(tilted(snap_spectrum, db, slope), hz)
        snap = chatter(click(colour, t60, pan, spike=0.16, width=0.58))
        add(snaps, s, amp(trim_db) * facet(snap, hz, ring))
    # a small patch of film radiates little bass
    snaps = high_passed(snaps, low_hz)
    return snaps + amp(ring_db) * hollow(snaps)


def scene(room_db=-11):
    """Pan and bag close by, a little to the left, over the low rush of the kitchen."""
    # phase by which the left side leads: (frequency [Hz], lead [radians])
    left_lead = [(100, 0), (1800, 0.19), (2600, 0.7), (5500, 0.57), (10000, 0.37)]
    pan = sizzle() + spits() + ticks()
    corn = heap() + thuds() + kernels() + knocks()
    sources = pan + corn + bag()
    near = filtered(sources, lambda hz: np.exp(.5j * np.outer([1, -1], along(left_lead, hz))))
    return kitchen() + amp(room_db) * room(near) + near


def record(dry):
    """Limited to full scale, with nothing above 15.9 kHz."""
    top_hz = 15900
    return filtered(np.clip(dry, -1, 1), lambda hz: hz < top_hz)


dry = scene()
out = record(dry)
file_out(out)
```